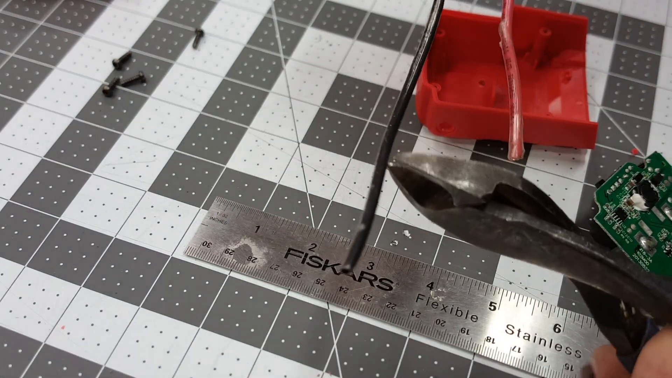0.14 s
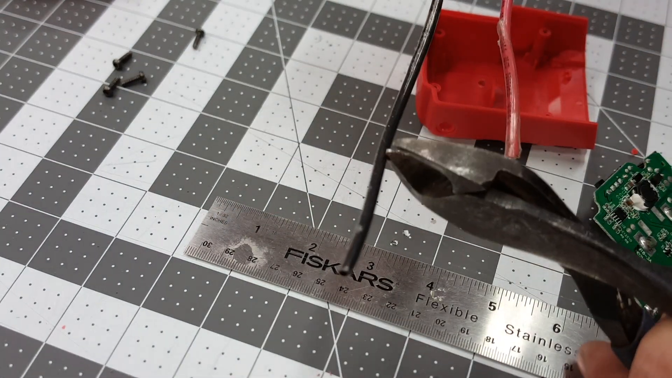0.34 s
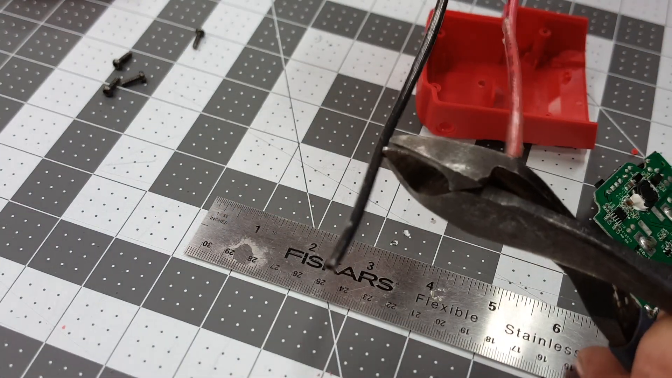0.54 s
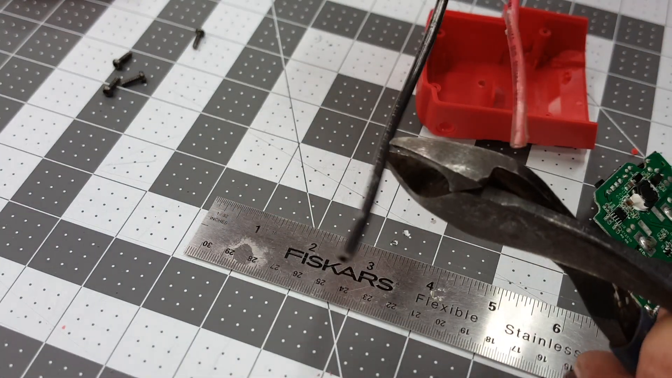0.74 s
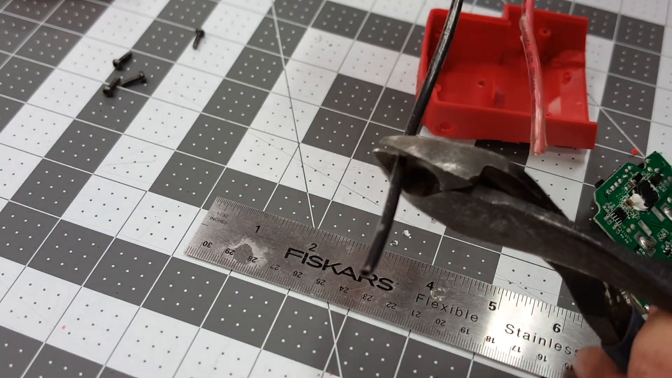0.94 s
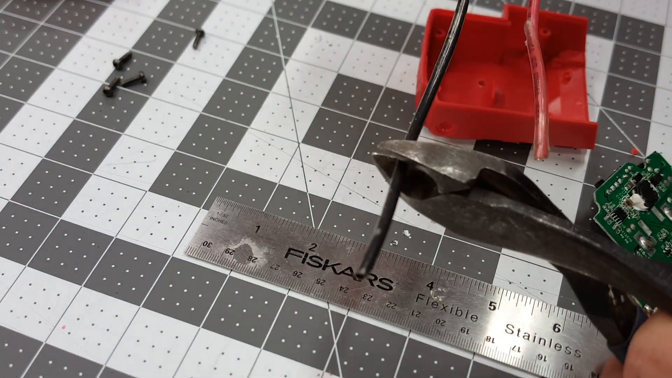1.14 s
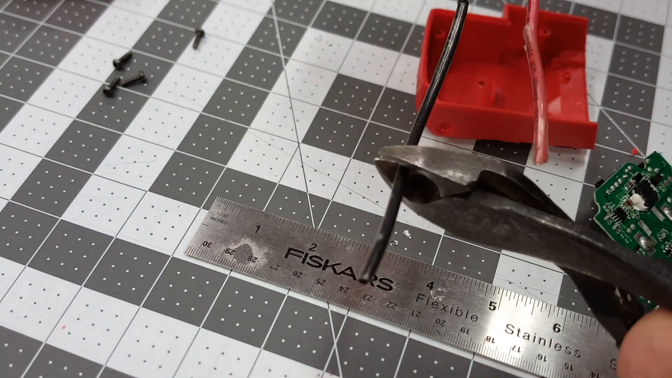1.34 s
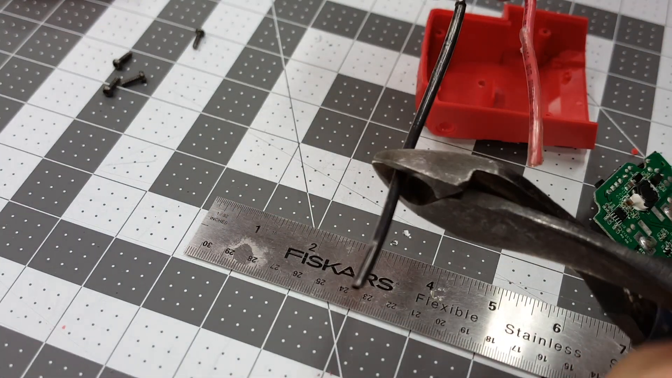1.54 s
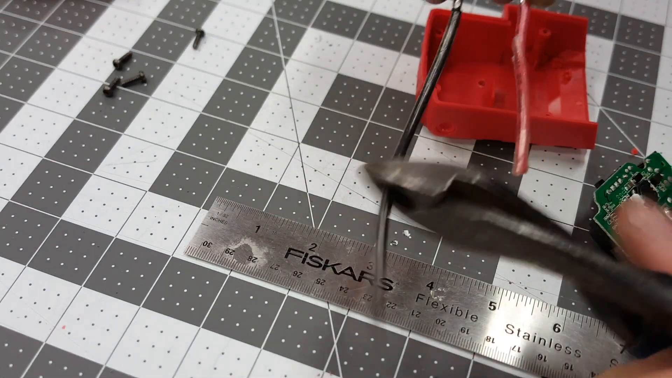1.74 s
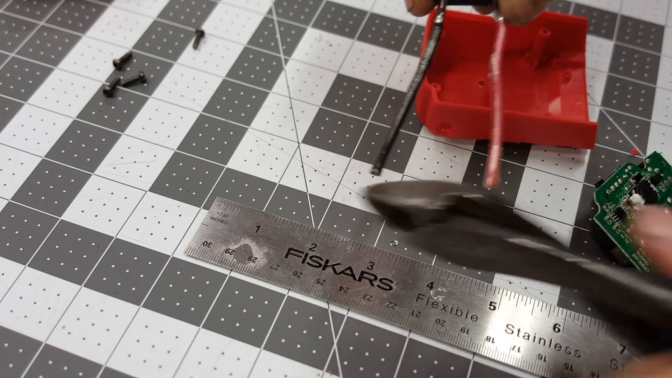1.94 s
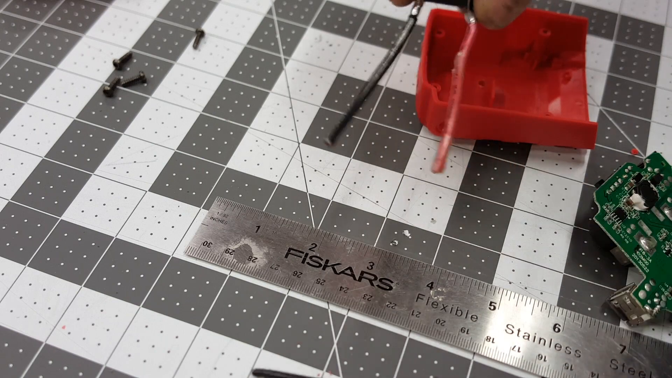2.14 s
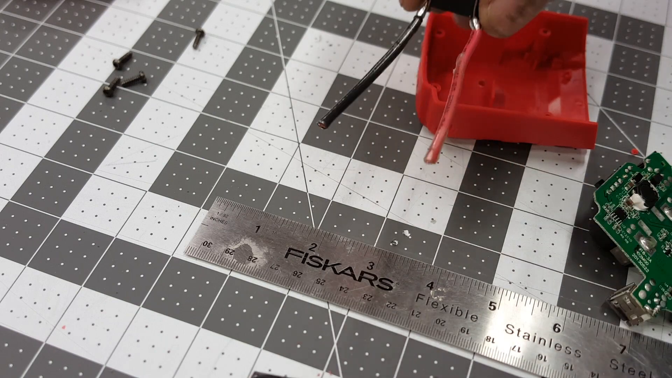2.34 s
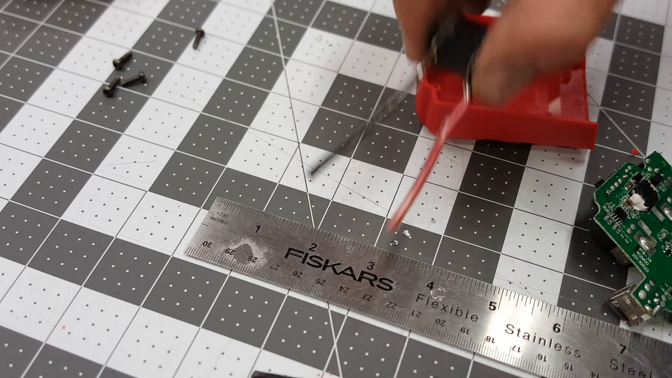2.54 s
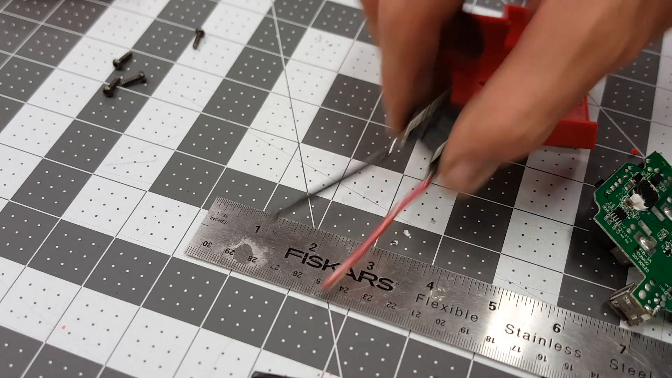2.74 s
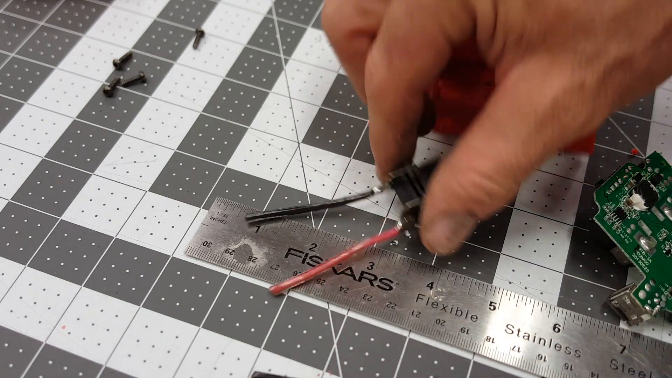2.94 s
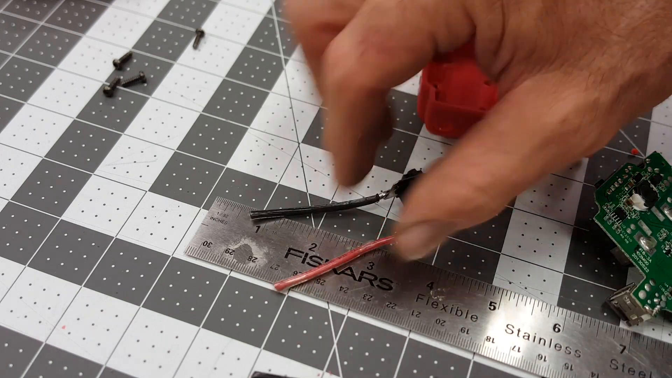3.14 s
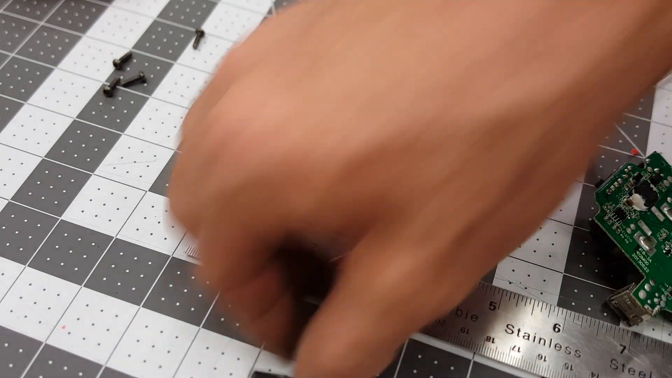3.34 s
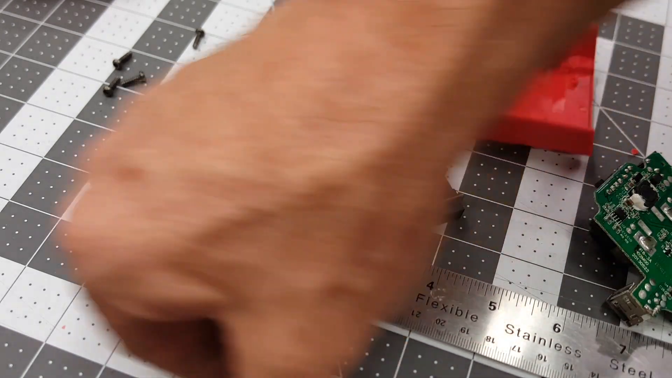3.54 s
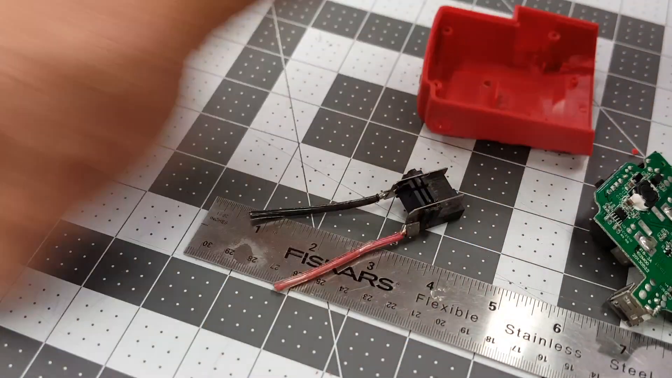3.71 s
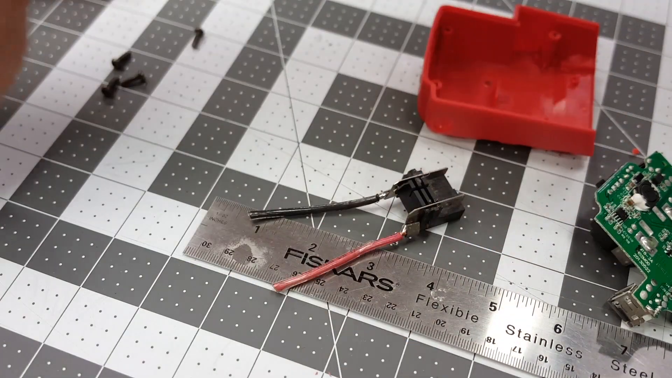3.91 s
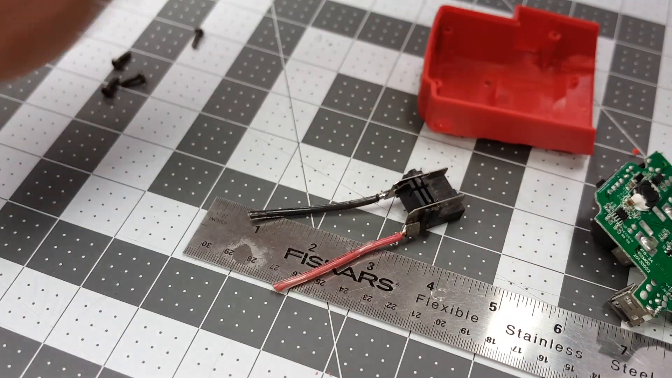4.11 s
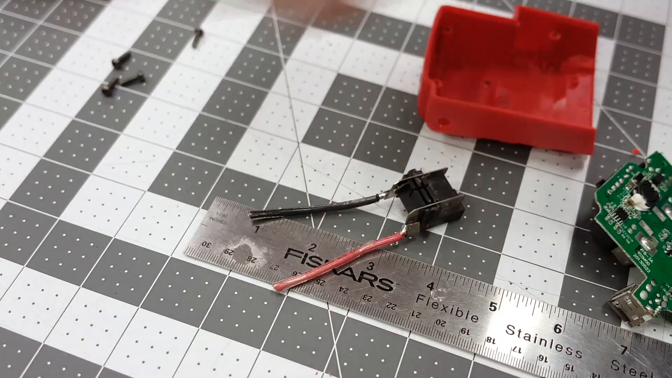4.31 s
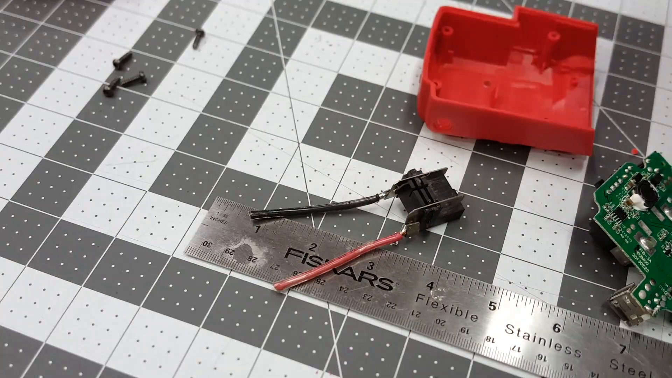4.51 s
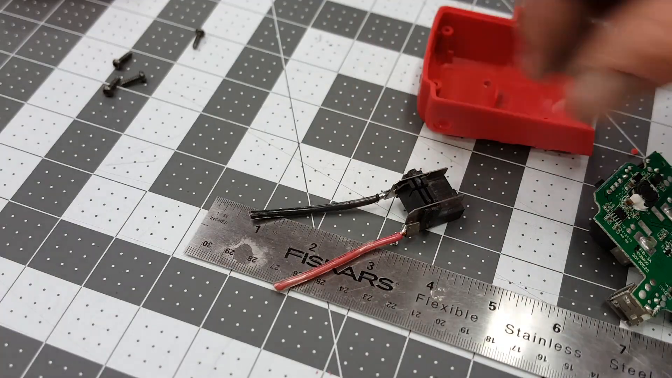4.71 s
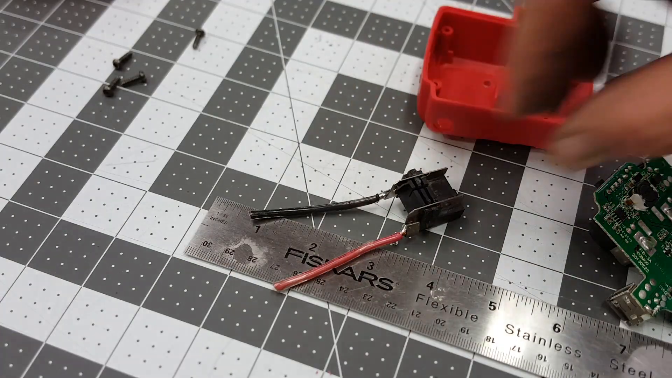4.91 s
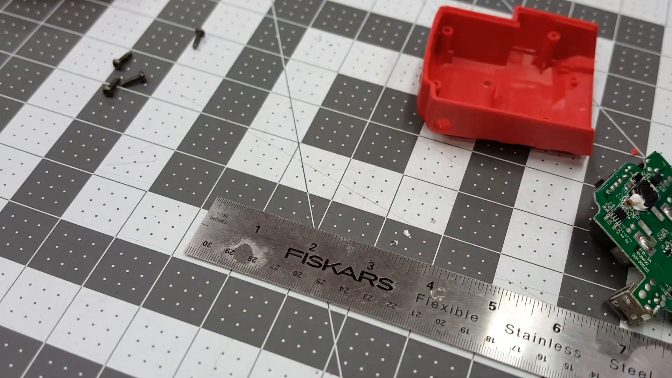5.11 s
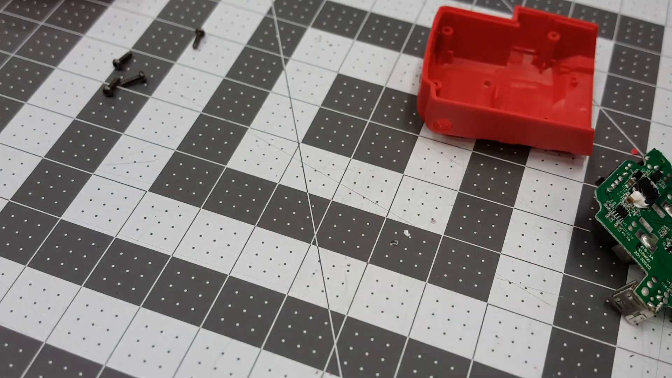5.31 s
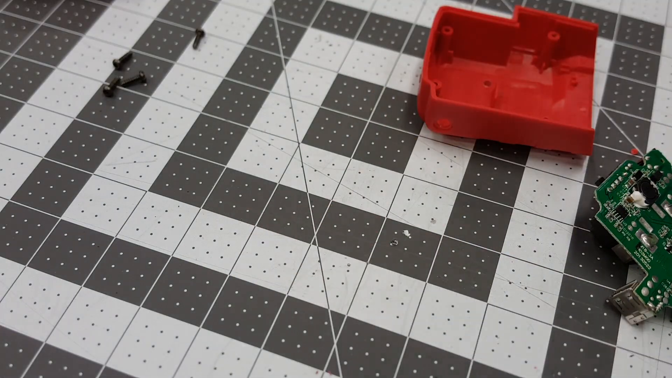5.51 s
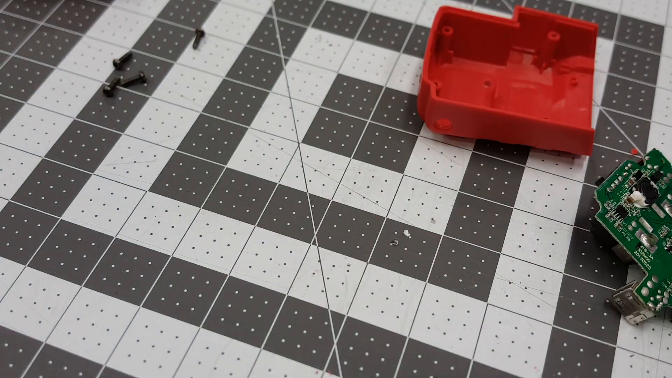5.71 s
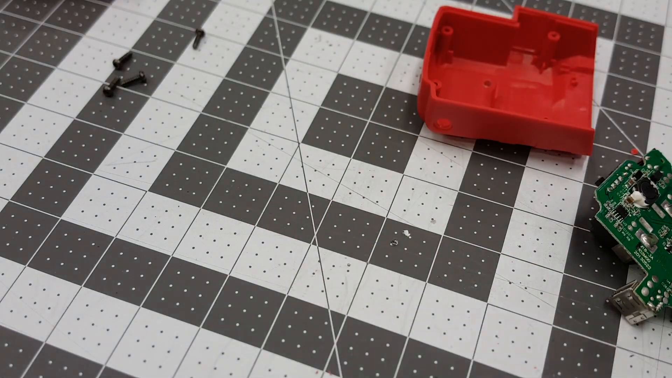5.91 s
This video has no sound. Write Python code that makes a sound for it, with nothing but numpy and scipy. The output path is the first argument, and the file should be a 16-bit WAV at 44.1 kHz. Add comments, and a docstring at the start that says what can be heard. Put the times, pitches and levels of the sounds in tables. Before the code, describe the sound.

Low ventilation rumble in a small room. After a tiny tick, diagonal cutters snap loudly, nearly overloading, and the wire offcut bounces in bright clicks. Parts are set down with soft thumps and ticks, then a hand sweeps the mat with a gritty hiss. The rumble abruptly becomes thinner air with faint hum, while a ruler and small things scuff and tick. Close stereo microphones.

```python
"""Snipping a wire at the bench

A small room, a close pair of microphones over a mat on a workbench. Diagonal cutters snip a wire, the offcut
bounces, parts are set down and slid about, a steel ruler is lifted away: bursts of impacts ring damped modes,
and filtered noise with grit makes the sliding. Behind it a ventilation rumble (noise and a low drone) abruptly
gives way to thinner air noise with a hum. The loudest snaps clip."""
import sys
import numpy as np
from scipy import signal
from scipy.fft import rfft, irfft, next_fast_len
from scipy.io import wavfile
from scipy.ndimage import uniform_filter1d

SR = 44100
rng = np.random.default_rng(int(sys.argv[2]) if len(sys.argv) > 2 else 0)


def wrap_up_sound(samples):
    """Save the sound to the file named by the first command line argument, as 16-bit audio."""
    columns = np.atleast_2d(samples).T
    # keep every value between -1 and 1, then stretch to whole-number steps
    tamed = np.clip(columns, -1, 1)
    steps = np.round(tamed * 32767).astype(np.int16)
    wavfile.write(sys.argv[1], SR, steps)


N = 266981   # length in samples


def from_db(db):
    """Amplitude gain of a level in dB."""
    return 10 ** (np.asarray(db) / 20)


def rms_one(x):
    """Scale to unit rms."""
    return x / np.sqrt(np.mean(x ** 2) + 1e-20)


def at_hz(points, hz):
    """Read the second column of a table against log frequency."""
    points = np.array(points)
    return np.interp(np.log(hz), np.log(np.maximum(points[:, 0], 1)), points[:, 1])


def drift(rate):
    """Slow random wander of unit rms: noise through a double pole at about rate Hz, drawn every 40 samples."""
    pole = np.exp(-80 * np.pi * rate / SR)
    noise = rng.standard_normal(N // 40 + 2002)
    slow = signal.lfilter([1], [1, -2 * pole, pole * pole], noise)[2000:]   # skip the settling
    return np.interp(np.arange(N) / 40, np.arange(len(slow)), rms_one(slow))


EDGES = 20 * 2 ** np.arange(0, 10, .5)   # half-octave band edges in Hz


def bands(x):
    """Yield half-octave slices with their centres in Hz; neighbours take turns on the first axis of x."""
    for k, (low, high) in enumerate(zip(EDGES, EDGES[1:])):
        band = signal.butter(2, [low, high], "band", fs=SR, output="sos")
        yield np.sqrt(low * high), signal.sosfilt(band, x[k % len(x)])


def coloured(x, spectrum):
    """Shape noise by a spectrum, silent below its first point, and scale to unit rms."""
    size = next_fast_len(N, real=True)
    hz = np.maximum(np.fft.rfftfreq(size, 1 / SR), 1)
    gain = from_db(at_hz(spectrum, hz)) * (hz > spectrum[0][0])
    return rms_one(irfft(rfft(x, size) * gain, size)[..., :N])


def patchy(x, patchy_db, rate):
    """Every band above 300 Hz swells and sinks on its own, partly with its lower neighbour."""
    out, last = 0, 0
    for k, (hz, part) in enumerate(bands(x[None])):
        own = drift(rate) if hz > 300 else 0
        sign = (-1) ** k   # keeps neighbours from cancelling at their shared edge
        out = out + sign * part * from_db(patchy_db * (own + .5 * last))
        last = own
    return out


def ringing(modes, strengths, size):
    """Sum of decaying sines, one per mode, each falling 60 dB in its t60."""
    hz, db, t60 = np.transpose(modes)[:, :, None]
    t = np.arange(size) / SR
    return np.sum(strengths[:, None] * from_db(db - 60 * t / t60) * np.sin(2 * np.pi * hz * t), axis=0)


# Where the action is before the microphones; the offcut and the sweeping hand are off to the left.
# Each row: start in seconds, delay to the right port in ms.
PLACES = [(0, -.05), (1.9, .09), (2.6, 0), (3.4, .17), (4.5, 0)]
LEFT_DB = 2   # left port over the right, dB


def spread(x, alike, s):
    """Mix a common and a differing signal to two ports; the place at time s sets which hears it first."""
    common, differing = np.sqrt(alike) * x[0], np.sqrt(1 - alike) * x[1]
    delay_ms = [ms for start, ms in PLACES if start <= s][-1]
    lag = round(delay_ms * SR / 1000)

    def late(v, n):
        return np.pad(v, (max(n, 0), 0))[:len(v)]

    left = late(common + differing, -lag) * from_db(LEFT_DB / 2)
    right = late(common - differing, lag) * from_db(-LEFT_DB / 2)
    return np.array([left, right])


SELF_NOISE_DB = -67   # rms


def self_noise():
    """The microphones' own hiss: independent white noise above 11.5 kHz on each side."""
    treble = signal.butter(2, 11500, "high", fs=SR, output="sos")
    return from_db(SELF_NOISE_DB) * rms_one(signal.sosfilt(treble, rng.standard_normal((2, N))))


def tones(lines, waver, flicker_db):
    """Steady tones whose pitch (relative waver) and level wander slowly."""
    out = 0
    for hz, db in lines:
        level = np.sqrt(2) * from_db(db + flicker_db * drift(7.6))
        cycles = hz * np.cumsum(1 + waver * drift(4.58)) / SR
        out = out + level * np.sin(2 * np.pi * cycles)
    return out


# Ventilation rumble filling the room. Each row: frequency in Hz, relative level per Hz in dB.
RUMBLE = [(22, -10), (49, -2.5), (172, -1), (241, 0), (285, -2), (513, -8), (738, -5.5), (1400, -17.5),
          (7310, -27), (16000, -41.5)]
# Low drone within the rumble. Each row: frequency in Hz, rms level in dB before flicker.
DRONE = [(59.2, -63.5), (123.8, -69)]
# The later, thinner air noise. Each row: frequency in Hz, relative level per Hz in dB.
THIN_AIR = [(30, -20), (161, -15), (233, -8), (303, -7.5), (473, -7.5), (600, -6), (866, -7.5),
            (1010, -7.5), (9970, -23), (16000, -36)]
# Hum over the thin air. Each row: frequency in Hz, rms level in dB before flicker.
HUM = [(231.5, -63), (468.3, -69.5), (699.8, -68.5), (861.3, -68.5)]
# Likeness of the air at the two microphones. Each row: frequency in Hz, left-right correlation (no unit).
LIKENESS = [(60, 0.94), (380, 0.76), (2380, 0.2), (15000, -0.67)]
RUMBLE_DB, THIN_AIR_DB = -53.5, -55   # rms of each noise
CHANGE_S = 4.53   # the rumble gives way here


def air():
    """Air noise, less alike on the two sides as pitch rises: rumble with drone, then thin air with hum."""
    late = np.clip((np.arange(N) / SR - CHANGE_S) / 0.0016, 0, 1)
    noise = 0
    for hz, (mid, side) in bands(rng.standard_normal((2, 2, N))):
        alike = np.clip(at_hz(LIKENESS, hz), -1, 1)
        noise = noise + np.sqrt(1 + alike) * mid + np.sqrt(1 - alike) * side * [[1], [-1]]
    early = from_db(RUMBLE_DB) * coloured(noise, RUMBLE) + tones(DRONE, waver=0.05, flicker_db=3)
    thin = from_db(THIN_AIR_DB) * coloured(noise, THIN_AIR) + tones(HUM, waver=0.0039, flicker_db=3.0)
    return (1 - late) * early + late * thin


# How long the small room rings. Each row: frequency in Hz, t60 in seconds.
ROOM = [(300, 0.39), (2000, 0.45), (8000, 0.36), (15000, 0.099)]
# Colour of the room's tail. Each row: frequency in Hz, relative reverberant level in dB.
ROOM_TONE = [(200, -36.5), (700, -32.5), (2500, -37.5), (5000, -36), (9000, -37), (15000, -39)]


def room(x):
    """A diffuse noise tail that builds up over some milliseconds and dies band by band, its own on each side."""
    t = np.arange(int(.6 * SR)) / SR
    tail = 0
    for hz, noise in bands(rng.standard_normal((2, 2, len(t)))):
        tail = tail + from_db(at_hz(ROOM_TONE, hz) - 60 * t / at_hz(ROOM, hz)) * noise
    tail = tail * np.clip((t - .003) / 0.0065, 0, 1)
    return signal.fftconvolve(x, tail, axes=1)[:, :N] * from_db(-5.5)


# Heavy contacts that strike the bench top. Each row: start in seconds, peak level in dB before the bass cut.
THUMPS = [(2.799, -25), (2.926, -33.5), (3.32, -20.5), (5.301, -37)]
# Modes of the bench top. Each row: frequency in Hz, relative level in dB, t60 in seconds.
BENCH = [(108.5, -3, 0.19), (135, 6, 0.019), (232.8, -8.5, 0.29)]


def bench():
    """The bench top's modes boom under heavy contacts, swelling over a few milliseconds."""
    out = np.zeros(N + 12000)
    boom = np.convolve(np.hanning(150), ringing(BENCH, np.ones(len(BENCH)), 8800))
    boom = boom / np.abs(boom).max()
    for s, db in THUMPS:
        start = round(s * SR)
        out[start:start + len(boom)] -= from_db(db) * boom
    return out[:N]


# Modes of the mat, small parts and ruler, rung by crackle, knocks and ticks alike.
# Each row: frequency in Hz, relative level in dB, t60 in seconds (crackle halves the t60 and ignores the level).
PARTS = [(370, 14, 0.014), (610, 22.5, 0.026), (790, 31, 0.013), (1170, 38.5, 0.0063),
         (1835, -14.5, 0.0026), (2130, -20.5, 0.0174), (2400, -3, 0.011), (2830, 11.5, 0.0061),
         (3494, 17, 0.004), (4130, 13, 0.012), (5420, -7, 0.0092), (7900, 0, 0.022)]
CRACKLE_PER_S, CRACKLE_DB = 250, -2.5   # typical snap rate, which wanders; level relative to the rub


def crackle():
    """Grit snaps unevenly in clumps, each snap briefly ringing one mode of the parts; rms 1."""
    chance = CRACKLE_PER_S * from_db(4 * drift(30.0)) / SR
    sizes = (rng.random(N) < chance) * from_db(4 * np.minimum(rng.exponential(1, N), 3))
    dealt = rng.integers(2, len(PARTS) - 1, N)   # which mode each snap rings
    rings = []
    for k, (hz, _, t60) in enumerate(PARTS):
        ring = ringing([(hz, 0, t60 / 2)], np.ones(1), 500)
        rings.append(signal.fftconvolve(sizes * (dealt == k), ring)[:N])
    common, differing = sum(rings), sum(rings[::2]) - sum(rings[1::2])
    return rms_one(np.array([common, differing]))


# A hand sweeps the mat, left of the microphones. Each row: time in seconds, rub level in dB.
SWEEP = [(3.54, -74), (3.646, -45.5), (3.72, -43.5), (3.85, -43.5), (3.921, -49), (3.979, -40),
         (4.04, -54.5), (4.15, -57.5), (4.33, -66.5)]
# Hand on mat, the dull rub. Each row: frequency in Hz, relative level per Hz in dB.
RUB = [(240, -26), (400, -22), (781, -12), (1540, -23), (3070, -9.5), (6000, -34.5), (7800, -24.5),
       (13200, -120)]
# Hand on mat, the bright hiss. Each row: frequency in Hz, relative level per Hz in dB.
HISS = [(2350, -18), (4000, -1), (6860, -8), (8210, -11.5), (14800, -4), (16000, 10)]
# Short scuffs. Each row: middle in seconds, half length in seconds, rub level in dB, hiss over the rub in dB.
SCUFFS = [(3.437, 0.068, -59.5, -4.5), (4.353, 0.024, -56, -11), (4.596, 0.14, -64, -3.5),
          (5.166, 0.041, -59.5, 1), (5.251, 0.022, -51.5, 0.5), (5.319, 0.031, -54, 2.5),
          (5.374, 0.0049, -53.5, 21.5), (5.388, 0.0068, -51.5, 19.5), (5.493, 0.016, -50, -11),
          (5.6, 0.026, -54, 2), (5.649, 0.025, -48.5, -7.5), (5.792, 0.014, -44.5, -2),
          (5.829, 0.017, -39.5, -15), (5.866, 0.016, -41, 6.5), (6.023, 0.018, -51, 0.5)]
# Short scuffs, the rub. Each row: frequency in Hz, relative level per Hz in dB.
SCUFF_RUB = [(240, -51), (400, -11.5), (979, 1), (1160, -5.5), (6000, -12), (7800, -16), (13200, -120)]
# Short scuffs, the hiss. Each row: frequency in Hz, relative level per Hz in dB.
SCUFF_HISS = [(2350, -18), (4000, -18.5), (6140, -13), (7880, 0), (11800, -5.5), (16000, 2)]
# The sweep's hiss: level at a rub of -42 dB, dB per dB of rub, and a steady fade throughout
HISS_DB, HISS_PER_RUB, HISS_FADE_DB_PER_S = -38.5, 1.54, 17


def sliding():
    """Things dragged on the mat: a duller rub and a bright hiss, both peppered with catching grit."""
    t = np.arange(N) / SR
    s, db = np.transpose(SWEEP)
    sweep_db = np.interp(t, s, db, -120, -120)
    rub_gain = from_db(sweep_db)
    # the fade passes through 0 dB at the second row
    hiss_gain = from_db(HISS_DB + HISS_PER_RUB * (sweep_db + 42) - HISS_FADE_DB_PER_S * (t - s[1]))

    scuff_rub = scuff_hiss = 0
    for middle, half, rub_db, hiss_db in SCUFFS:
        width = half * np.where(t < middle, .7, 1.2)   # quick to bite, slower to let go
        swell = np.exp(-((t - middle) / width) ** 2)
        scuff_rub = scuff_rub + from_db(rub_db) * swell
        scuff_hiss = scuff_hiss + from_db(rub_db + hiss_db) * swell

    # about 300 catches a second, each flaring and dying with a time constant of 1 ms
    catches = (rng.random(N) < 300 / SR) * from_db(4 * np.minimum(rng.exponential(1, N), 3))
    grit = signal.lfilter([1], [1, -np.exp(-1 / (0.001 * SR))], catches)
    sweep_grit, scuff_grit = 1 + .3 * grit, 1 + .5 * grit   # the scuffs catch harder than the sweep

    rub, hiss = rng.standard_normal((2, 2, N)) * from_db(1.5 * drift(130))
    hiss = patchy(hiss, patchy_db=1.8, rate=14.0)
    rub = patchy(rub, patchy_db=1.5, rate=18.0)
    snaps = from_db(CRACKLE_DB) * crackle()

    sweep = rub_gain * (coloured(rub * sweep_grit, RUB) + snaps)
    sweep = sweep + hiss_gain * coloured(hiss * sweep_grit, HISS)
    scuffs = scuff_rub * (coloured(rub * scuff_grit, SCUFF_RUB) + snaps)
    scuffs = scuffs + scuff_hiss * coloured(hiss * scuff_grit, SCUFF_HISS)
    return spread(sweep, 0.49, s[0]) + spread(scuffs, 0.81, SCUFFS[-1][0])


def knock(hz, luck):
    """One soft push rings the part modes near its pitch; peak 1, weaker and inverted in the differing signal."""
    push = -np.hanning(max(round(SR / hz * 0.079), 3))
    near = luck * np.exp(-(np.log2(np.array(PARTS)[:, 0] / hz) / 0.64) ** 2)
    x = np.convolve(push, ringing(PARTS, near, 2000))[:2000]
    return x / np.abs(x).max() * [[1], [-.2]]


# Low knocks, some of them the body of a snip or tick. Each row: start in seconds, level in dB, pitch in Hz.
KNOCKS = [(1.7804, -4, 274), (2.0377, -24.5, 440), (2.799, -7.5, 626), (2.8143, -32, 298),
          (3.038, -21, 386), (3.3176, -28, 960), (3.829, -35, 800), (3.8505, -43, 930), (5.646, -36, 1030)]
# Small parts tick on the mat and on each other, close to the microphones.
# Each row: start in seconds, click level in dB, click pitch in Hz, treble crack over the click in dB.
CONTACTS = [(1.565, -39, 1920, 8), (1.9263, -21, 2300, -10), (1.9365, 2, 2780, -5.5), (2.038, -39, 2670, 0),
            (2.083, -5.5, 2840, 3), (2.0872, -1, 2980, -15), (2.116, -19, 2580, -10),
            (2.1748, -14.5, 2840, -8.5), (2.7967, -15, 3150, -7), (2.8153, -28, 1960, -4),
            (2.962, -29.5, 2370, -7), (2.993, -28.5, 2550, -19), (3.0377, -14.5, 3700, 1.5),
            (3.0505, -15.5, 3070, -4.5), (3.108, -33.5, 2400, -16), (3.318, -33.5, 3320, -3.5),
            (3.407, -30, 2830, -5), (3.4436, -16, 3300, -6.5), (3.6775, -31, 3730, 5),
            (3.7918, -38, 2980, -4), (3.816, -29, 2550, -9), (3.8508, -13, 3080, -6),
            (3.8877, -20.5, 2100, -20), (3.9731, -18, 3500, -9), (4.055, -36, 3000, -11),
            (4.0848, -28, 3100, -18), (4.126, -30, 2750, -13), (4.2257, -36.5, 2540, 0.5),
            (4.233, -33, 2800, -10), (4.257, -34.5, 2580, -21), (4.389, -25, 3630, -2.5),
            (5.2677, -42, 2050, 7), (5.4886, -53, 2550, -10), (5.5926, -35.5, 7900, -16),
            (5.6137, -35.5, 4300, 5), (5.6572, -41, 3800, -4), (5.7903, -25, 3500, 2),
            (5.856, -22.5, 2600, 8), (5.8605, -21.5, 4600, 11), (5.8737, -24, 3700, 12.5)]
# The jaws snap shut. Each row: start in seconds, click level in dB, click pitch in Hz, crack over it in dB.
SNIP = [(1.7811, -4, 1400, 5)]
# Modes of the cutters. Each row: frequency in Hz, relative level in dB, t60 in seconds.
CUTTERS = [(1190, -3, .008), (2365, 1, .012), (3455, 2, .011), (3950, -2, .007), (4435, -2, .012),
           (6725, 3, .01), (7435, 7, .007)]
CHATTER_MS = 4.43   # time constant of the tiny impacts dying away after each blow
TICK_KNOCK_DB, TICK_KNOCK_HZ = -18.5, 387   # every tick also nudges the mat, this far below its click


def contacts():
    """Each tick is a burst of tiny impacts: it rings modes, cracks in the treble and nudges the mat."""
    out = np.zeros((2, N + 2000))
    part_hz = np.array(PARTS)[:, 0]
    t = np.arange(2000) / SR
    treble = signal.butter(1, [3200, 8500], "band", fs=SR, output="sos")
    for s, click_db, click_hz, crack_db in SNIP + CONTACTS:
        burst = rng.standard_normal((2, 2000)) * np.exp(-1000 * t / CHATTER_MS)
        burst[:, :65] *= .4   # a graze comes just before the blow
        burst[0, 65] -= 14   # one clean blow stands far above the chatter
        burst[1, 68] -= 7   # a second, weaker blow in the differing signal widens the click

        luck = from_db(rng.normal(0, 2, len(part_hz)))   # each blow excites the modes differently
        if s == SNIP[0][0]:
            ring = ringing(CUTTERS, luck[:len(CUTTERS)], 2000)
        else:
            near = luck * np.exp(-(np.log2(part_hz / click_hz) / 0.26) ** 2)
            ring = ringing(PARTS, near, 2000)

        soft = uniform_filter1d(burst, size=5, origin=2)   # the contact patch rounds each impact
        click = signal.fftconvolve(soft, ring[None])[:, :2000]
        # small parts radiate poorly below their pitch
        bass_cut = signal.butter(2, 0.42 * click_hz, "high", fs=SR, output="sos")
        click = signal.sosfilt(bass_cut, click)
        crack = signal.sosfilt(treble, burst)

        sound = click / np.abs(click[0]).max() + from_db(crack_db) * crack / np.abs(crack[0]).max()
        sound[:, 50:] += from_db(TICK_KNOCK_DB) * knock(TICK_KNOCK_HZ, luck)[:, :-50]
        start = round(s * SR) - 30
        out[:, start:start + 2000] += from_db(click_db) * spread(sound, .75, s)

    for s, db, knock_hz in KNOCKS:
        luck = from_db(rng.normal(0, 2, len(part_hz)))
        start = round(s * SR)
        out[:, start:start + 2000] += from_db(db) * spread(knock(knock_hz, luck), .85, s)
    return out[:, :N]


def scene():
    """Everything on the bench, its reverberation and the air; small things radiate no deep bass."""
    bass_cut = signal.butter(4, 90, "high", fs=SR, output="sos")
    near = signal.sosfilt(bass_cut, contacts() + sliding() + bench())
    return near + room(near) + air() + self_noise()


CUTOFF_HZ, OFFSET = 16450, -.0015   # top of the treble; constant shift, full scale 1


def record(dry):
    """The input clips hard at full scale, the top is cut steeply and a small constant offset is added."""
    treble_cut = signal.cheby2(16, 70, CUTOFF_HZ, fs=SR, output="sos")
    cut = signal.sosfilt(treble_cut, np.clip(dry, -1, 1))
    return np.clip(cut + OFFSET, -1, 1)


dry = scene()
out = record(dry)
wrap_up_sound(out)
```